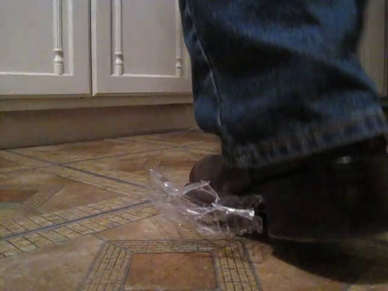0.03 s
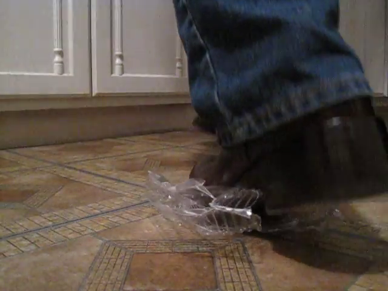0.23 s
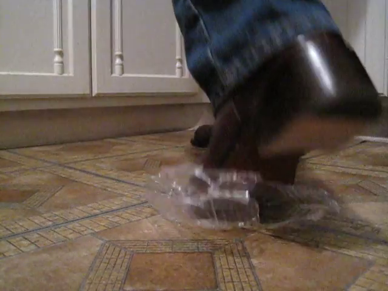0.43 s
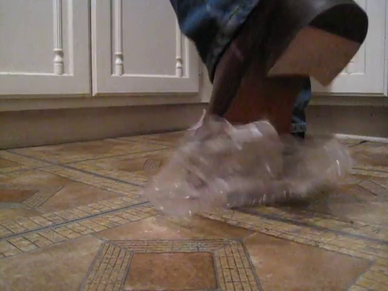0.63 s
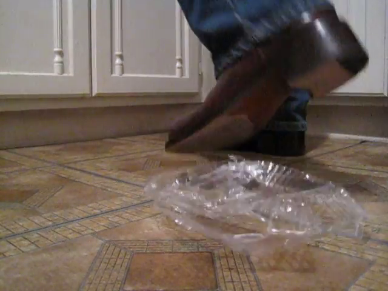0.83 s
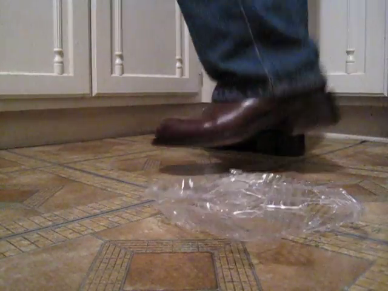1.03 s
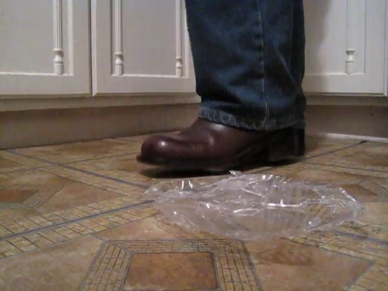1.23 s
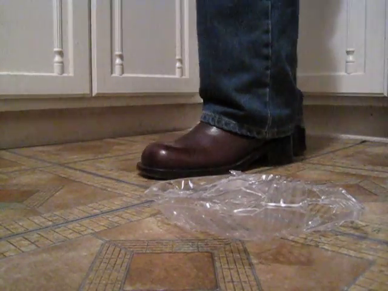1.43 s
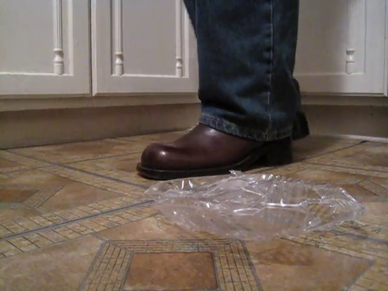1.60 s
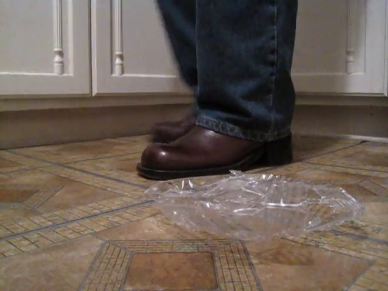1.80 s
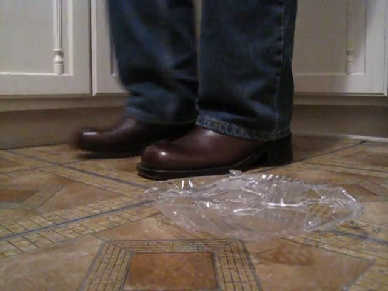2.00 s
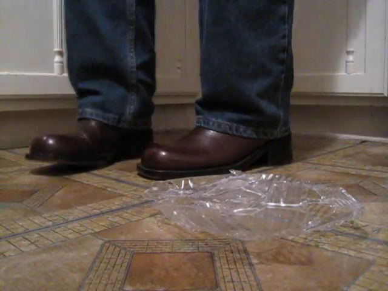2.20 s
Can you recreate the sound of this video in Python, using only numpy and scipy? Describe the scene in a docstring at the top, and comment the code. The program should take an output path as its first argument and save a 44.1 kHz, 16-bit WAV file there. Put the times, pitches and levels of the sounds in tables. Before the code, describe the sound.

Close up in a tiled kitchen, thin plastic crackles and buckles as a boot rolls off a container. It pops back into shape and ticks lightly, then come two quiet, dull footsteps and a low room hum.

```python
"""Boot off a plastic container

Tiled kitchen, one microphone close in. A boot rolls off a thin clear plastic container on the floor:
the walls crinkle, buckle in sharp snaps, spring back in two loud pops and tick as they settle.
Two soft steps follow. The background of room murmur and mains hum dips after the loud snaps
and comes back up as the recorder's gain recovers."""
import sys
import numpy as np
from scipy import signal
from scipy.fft import rfft, irfft, next_fast_len
from scipy.io import wavfile
from scipy.ndimage import map_coordinates

SR = 44100
rng = np.random.default_rng(int(sys.argv[2]) if len(sys.argv) > 2 else 0)


def bounce(signal):
    """Save signal as a 16-bit WAV file at the path given by the first command-line argument."""
    frames = np.transpose(np.atleast_2d(signal))
    limited = np.clip(frames, -1, 1)
    pcm = np.round(limited * 32767).astype(np.int16)
    wavfile.write(sys.argv[1], SR, pcm)


N = 103635
TIME = np.arange(N) / SR
EVENT_TIME = TIME[:SR // 3]
FFT_SIZE = 4096
HZ = np.fft.rfftfreq(FFT_SIZE, 1 / SR)
TILT_OCTAVES = np.log2(np.maximum(HZ, 400) / 3000)  # tilts pivot at 3 kHz, flat below 400 Hz

# Spectrum of the thin plastic wall: f/Hz, level/dB
PLASTIC_COLOUR = [(60, -32), (200, -18.5), (450, -11), (900, -2.5), (2500, 3), (5000, -1), (9000, -6),
                  (13000, -12.5), (16000, -28)]


def amp(db):
    """Decibels to gain."""
    return 10 ** (np.asarray(db) / 20)


def unit_rms(x):
    """Scale to rms 1."""
    return x / np.sqrt(np.mean(x ** 2) + 1e-20)


def over_frequency(points, hz=HZ):
    """Read (f/Hz, value) points on a log axis."""
    f, values = np.transpose(points)
    return np.interp(np.log(hz + 1), np.log(f + 1), values)


def envelope(points):
    """Gain at every sample from (t/s, level/dB) points."""
    return amp(np.interp(TIME, *np.transpose(points)))


def add(track, start_s, sound):
    """Mix a sound into the track."""
    part = track[max(round(start_s * SR), 0):][:len(sound)]
    part += sound[:len(part)]


def coloured(x, colour_db):
    """Minimum-phase filter of unit energy, its shape given on the HZ grid."""
    cepstrum = irfft(np.log(np.maximum(amp(colour_db), 1e-6)))
    cepstrum[1:FFT_SIZE // 2] *= 2
    cepstrum[FFT_SIZE // 2 + 1:] = 0
    pulse = irfft(np.exp(rfft(cepstrum)))
    return signal.fftconvolve(x, pulse / np.linalg.norm(pulse))[:len(x)]


def mode(hz, db, t60, t=EVENT_TIME, phase=0):
    """A struck resonance: a sine that falls 60 dB in t60 seconds."""
    return amp(db - 60 * t / t60) * np.sin(2 * np.pi * hz * t + phase)


def burst(t60, colour_db, spike_db):
    """A spike and a dying flutter, coloured by the body that gives way."""
    fade = amp(-60 * EVENT_TIME / t60)
    flutter = fade * rng.standard_normal(len(fade))
    flutter[0] = amp(spike_db)
    sound = coloured(flutter, colour_db)
    return sound * np.linalg.norm(fade) / np.linalg.norm(sound)


def in_kitchen(x, send_db=0):
    """Direct sound, then a tail off tiles and cupboards and the boom of a low room mode."""
    # Reverberation time: f/Hz, t60/s
    decay = [(150, .3), (400, 0.2), (1000, 0.27), (2800, .3), (7000, .25), (14000, .17)]
    # Spectrum of the reflections: f/Hz, level/dB
    colour = [(150, 6.5), (1000, 5.5), (2800, 1), (7000, 0), (14000, -5)]
    hz, t, noise = signal.stft(rng.standard_normal(SR // 2), SR, nperseg=256)
    gain = amp(over_frequency(colour, hz)[:, None] - 60 * t / over_frequency(decay, hz)[:, None])
    tail = signal.istft(noise * gain, SR, nperseg=256)[1]
    t = TIME[:len(tail)]
    tail *= 1 - np.exp(-t / .008)  # reflections build up
    response = amp(-9 + send_db) * tail / np.linalg.norm(tail)
    response += mode(hz=180, db=-56, t60=.17, t=t)
    response[0] = 1  # direct path to the microphone
    return signal.fftconvolve(x, response)


def room_tone():
    """The kitchen's murmur and an appliance hum whose partials waver in level and pitch."""
    # Spectrum of the murmur: f/Hz, level/dB
    murmur_colour = [(25, -20.5), (60, -11), (90, -9), (125, -5), (150, -14), (230, -8), (290, -12),
                     (390, -5), (560, -15), (820, -17), (1500, -23.5), (4000, -29), (10700, -36),
                     (16000, -46.5)]
    # Partials of the hum: f/Hz, relative level/dB
    partials = [(59.3, -8), (118.6, -11), (178, -15.5), (237, -14), (385, -18), (473, -13.5), (527, -20),
                (587, -16)]
    # The recorder's gain dipping and recovering, as a set curve on the background: t/s, level/dB
    recorder_gain = [(0, -65.5), (.3, -62.5), (.55, -69.5), (.95, -67.5), (1.15, -66.5), (1.4, -64),
                     (1.7, -58.5), (2.05, -56), (2.35, -56.5)]
    waver, mains_hz = .25, partials[0][0]
    murmur = unit_rms(coloured(rng.standard_normal(N), over_frequency(murmur_colour)))
    hum = np.zeros(N)
    for hz, db in partials:
        knots = rng.standard_normal((2, 16))
        swell, drift = [map_coordinates(row, [np.linspace(0, 15, N)]) for row in knots]
        phase = 2 * np.pi * hz * TIME + waver * drift * hz / mains_hz
        hum += amp(db) * np.sqrt(2) * (1 + waver * swell) * np.sin(phase)
    return envelope(recorder_gain) * (amp(-2) * murmur + hum)


def crinkle():
    """Tiny creases tick at random while the plastic is strained."""
    # Crinkling under the sole: t/s, level/dB
    levels = [(0, -45.5), (.05, -47), (.16, -46.5), (.3, -39.5), (.45, -36.5), (.6, -46.5), (.7, -56.5),
              (.8, -90)]
    creases_per_s, spread_db, t60 = 800, 1.5, .022
    onsets = rng.random(N) < creases_per_s / SR
    spikes = onsets * amp(spread_db * rng.standard_normal(N)) * rng.choice([-1, 1], N)
    fade = amp(-60 * TIME[:FFT_SIZE] / t60)
    flutter = signal.fftconvolve(np.abs(spikes), fade)[:N] * rng.standard_normal(N)
    ticks = coloured(.4 * unit_rms(spikes) + unit_rms(flutter), over_frequency(PLASTIC_COLOUR))
    return in_kitchen(unit_rms(ticks) * envelope(levels))[:N]


def wall_snaps():
    """Each patch of wall flips over with a crack of its own colour and a brief note."""
    # Buckling patches: t/s, level/dB, t60/s, tilt/(dB/octave), resonance f/Hz, its boost/dB
    snaps = [ (.0005, -37, .015, -1, 6000, 2.5), (.0195, -36, .015, 5, 6500, 0),
             (.0393, -39.5, .025, 4, 7000, 4), (.0582, -19, 0.018, -.5, 4700, 5.5),
             (.0662, -24.5, .05, 1, 12000, 5), (.0742, -23, .035, -1.5, 12000, 5.5),
             (.0947, -8.5, .003, -3, 2920, 8), (.146, -37.5, .03, 3.5, 6000, 2.5),
             (0.181, -41, 0.045, -6.5, 352, 11), (0.1829, -21.5, 0.0029, 2.5, 7000, 7),
             (.186, -20, .009, 5.5, 6000, 7), (.188, -29.5, .2, 5.5, 5600, 19),
             (.225, -41, .03, -8, 850, 12.5), (.258, -30.5, .05, 1.5, 3600, 1.5),
             (.2877, -10.5, 0.016, 2.5, 7300, 7.5), (.2885, -28, 0.052, -3, 1183, 15.5),
             (.3357, -25.5, .04, 2, 4322, 11.5), (.3407, -15.5, 0.027, 2, 4830, 2.5),
             (.3715, -20, 0.0092, 6, 12000, 11.5), (.3875, -22, .035, 0.5, 3100, 8),
             (.414, -32, .04, 2, 2200, 7.5), (.4185, -18.5, .026, 0, 6500, 1),
             (.4548, -19.5, .035, -2, 3000, -1.5), (.465, -30, .03, 0, 2000, -1),
             (0.473, -9.5, 0.0051, 7, 7200, 4), (.4813, -19, .01, 4, 11500, 1),
             (.4903, -22, 0.036, 0, 750, 6), (.4915, -10.5, .011, 0, 10500, 5),
             (.495, -13.5, .04, 2, 3600, 3.5), (.507, -24, .075, -2, 3088, 11),
             (.549, -48, .03, 4.5, 11000, 3.5), (.58, -25.5, .09, -1.5, 900, 0.5),
             (.592, -34, .02, 7, 4000, 5), (.608, -32, .07, -1.5, 2500, -1.5),
             (0.661, -41, 0.045, -6, 3000, 0.5), (0.6808, -39, .02, -3.5, 4200, 10.5),
             (.7152, -28.5, .06, -0.5, 2600, 5), (.735, -11.5, .045, 1.9, 4700, 3),
             (0.7403, -17.5, .07, -1, 2800, 3.5), (.852, -43.5, 0.19, -1.5, 3040, 4.5),
             (0.9053, -43.5, 0.061, -1, 8000, 1), (.922, -52.5, 0.14, -3.5, 2980, 9),
             (0.9411, -40, 0.026, -1, 2400, 6), (.9515, -40, .035, -0.5, 6000, 1),
             (1.0067, -45.5, 0.062, 1, 2900, 12.5), (1.0175, -42.5, 0.029, 0, 6500, 5),
             (1.0275, -43.5, 0.041, 0, 6500, 4), (1.045, -47, .02, -4, 6500, 4),
             (1.0795, -46, .04, -1.5, 4300, 5), (1.117, -57.5, .02, 4, 6500, 18),
             (1.1395, -46, 0.0092, -3, 3100, 18.5), (1.2025, -61, .015, 0, 3100, 16),
             (1.2568, -63.5, .015, -4, 3100, 19)]
    release_s, ring_above_db, patch_octaves = .485, -36, .41
    out = np.zeros(N)
    for start_s, db, t60, tilt, patch_hz, boost_db in snaps:
        resonance = 1 / (1 + (np.log2((HZ + 1) / patch_hz) / patch_octaves) ** 2)
        colour_db = over_frequency(PLASTIC_COLOUR) + tilt * TILT_OCTAVES + boost_db * resonance
        spike_db = 4.5 + 10 * np.log10(.017 / t60)  # shorter snaps are more spike than flutter
        crack = burst(t60, colour_db, spike_db)
        ping = mode(patch_hz, db=boost_db - 20, t60=min(2 * t60, .03))
        released = start_s > release_s
        # Less reaches the room while the boot covers the plastic.
        sound = in_kitchen(crack + ping, send_db=0 if released else -5)
        if released and db > ring_above_db:
            add(sound, 0, amp(-8) * np.sqrt(t60) * shell_ring(colour_db))
        add(out, start_s, amp(db) * sound)
    return out


def shell_ring(snap_colour_db):
    """Free of the sole, the whole shell rings, each mode as strongly as the snap drives it."""
    # Modes of the container: f/Hz, level/dB
    shell_modes = [(829, -10.5), (985, -12.5), (1167, -3.5), (1650, -4), (1940, -4), (2164, -3.5),
                   (2399, -3), (2625, -1), (2892, -4.5), (3147, -4.5), (3309, -3.5), (3465, -2.5),
                   (3757, -6), (4268, -5), (4745, -5.5)]
    hz, db = np.transpose(shell_modes)[:, :, None]
    drive_db = np.interp(hz, HZ, snap_colour_db - snap_colour_db.max())
    scatter_db = 2 * rng.standard_normal(hz.shape)
    phase = rng.uniform(0, 2 * np.pi, hz.shape)
    return mode(hz, db + drive_db + scatter_db, t60=.19, phase=phase).sum(0)


def footfalls():
    """Each dull thud knocks a damped note from the sole and rings the floor."""
    # Heel and sole meeting the tiles: t/s, level/dB, t60/s, knock f/Hz
    contacts = [(1.288, -49.5, 0.051, 480), (1.299, -52, 0.065, 352), (2.23, -43.5, 0.045, 520),
                (2.242, -49.5, .05, 283), (2.253, -49.5, 0.067, 280), (2.318, -49, .025, 352)]
    # Spectrum of the thud: f/Hz, level/dB
    thud_colour = [(50, -22.5), (120, -8), (190, 11), (330, 8.5), (500, 1.5), (800, -15), (1500, -26),
                   (5000, -49), (15000, -55)]
    floor = mode(hz=184.6, db=-9.5, t60=.11)
    out = np.zeros(N)
    for start_s, db, t60, knock_hz in contacts:
        thud = burst(t60, over_frequency(thud_colour), spike_db=17)
        knock = mode(knock_hz, db=-2.5, t60=t60)
        add(out, start_s, amp(db) * in_kitchen(thud + knock + floor))
    return out


def leather_scuffs():
    """Boot leather ticks and scuffs lightly as the feet move."""
    # Ticks and scuffs: t/s, level/dB, t60/s, tilt/(dB/octave)
    scuffs = [(1.479, -68, 0.027, 7), (1.499, -59.5, 0.072, -1), (1.718, -64, 0.22, -5.5),
              (1.874, -58, 0.0084, 6), (2.231, -59, .03, 5), (2.2958, -43.5, 0.015, -5),
              (2.312, -66.5, 0.18, -5.5)]
    # Spectrum of the leather: f/Hz, level/dB
    leather_colour = [(60, -27), (300, -10), (900, -3), (2100, -1.5), (3500, -4.5), (6000, -8),
                      (10000, -13), (16000, -29)]
    out = np.zeros(N)
    for start_s, db, t60, tilt in scuffs:
        colour_db = over_frequency(leather_colour) + tilt * TILT_OCTAVES
        add(out, start_s, amp(db) * in_kitchen(burst(t60, colour_db, spike_db=16)))
    return out


def scene():
    """Container, boots and kitchen at one close microphone."""
    return (wall_snaps() + crinkle() + footfalls() + leather_scuffs() + room_tone())[None]


def record(dry):
    """The recorder cuts off steeply at the top of its band."""
    cutoff_hz = 16300
    size = next_fast_len(N + FFT_SIZE)
    hz = np.fft.rfftfreq(size, 1 / SR)
    lowpass = 1 / np.sqrt(1 + (hz / cutoff_hz) ** 120)
    return irfft(rfft(dry, size) * lowpass, size)[:, :N]


dry = scene()
out = record(dry)
bounce(out)
```